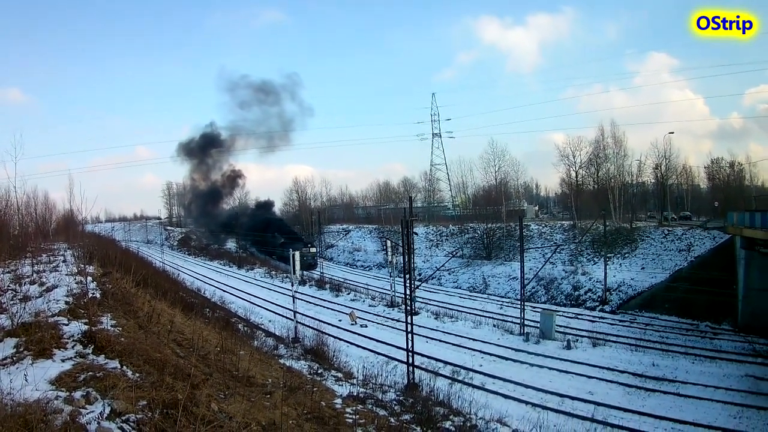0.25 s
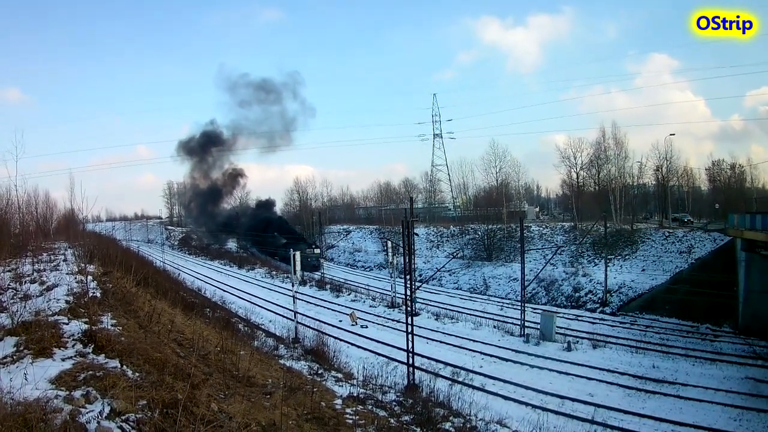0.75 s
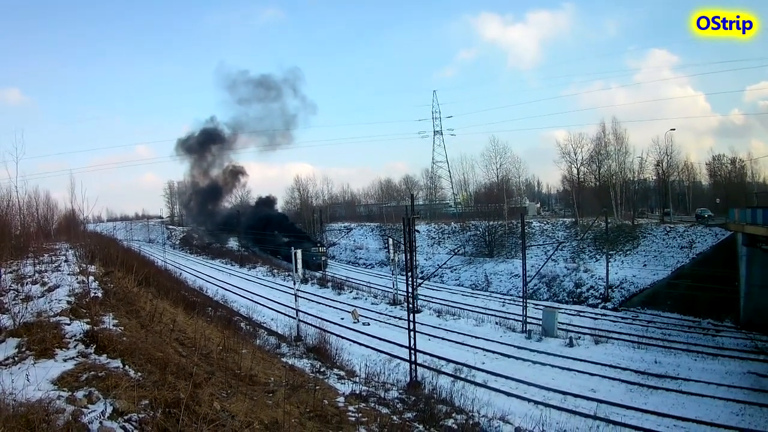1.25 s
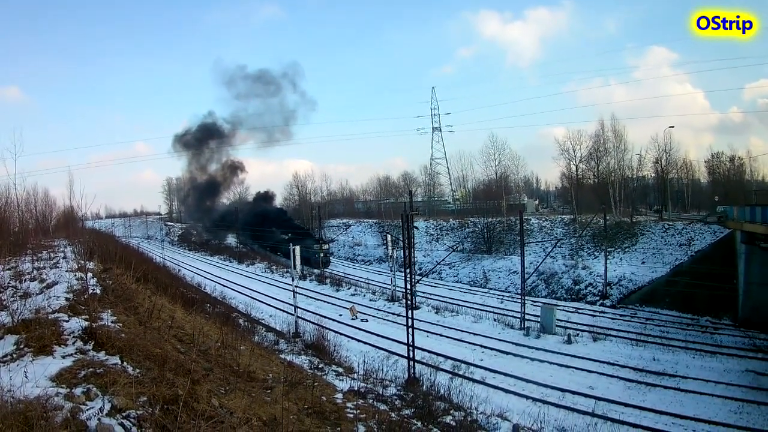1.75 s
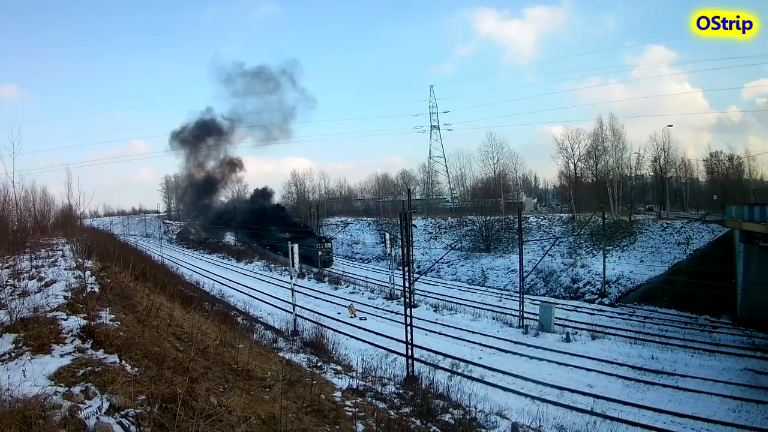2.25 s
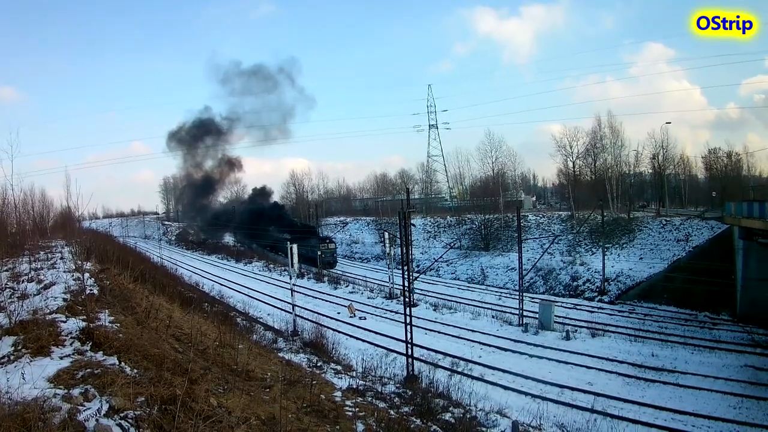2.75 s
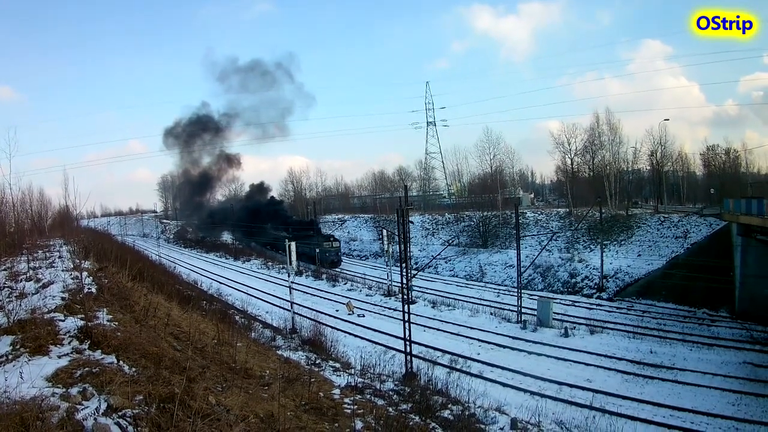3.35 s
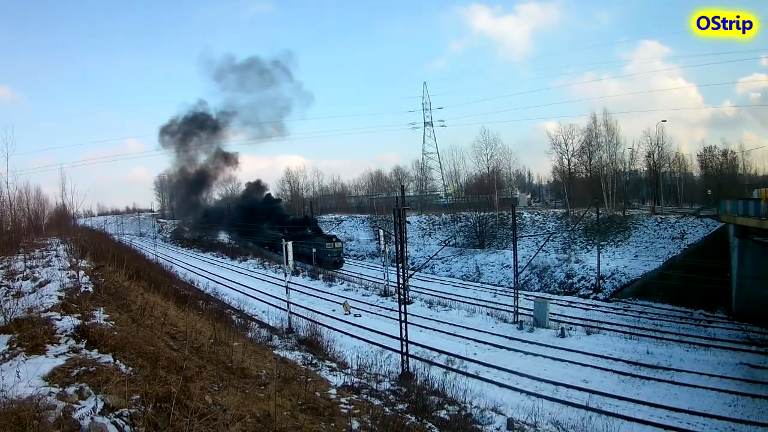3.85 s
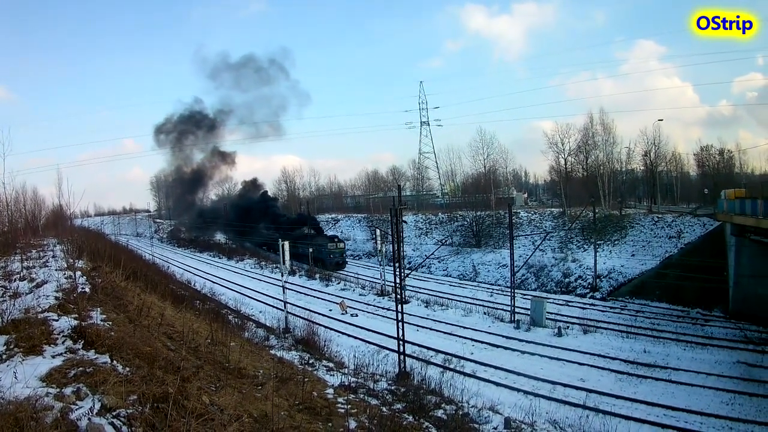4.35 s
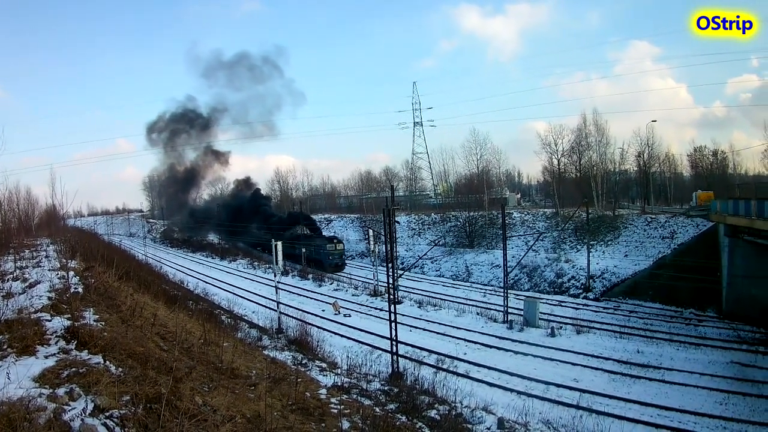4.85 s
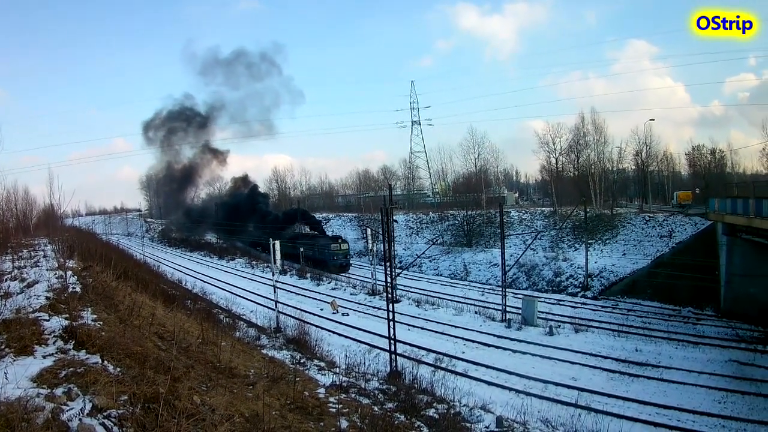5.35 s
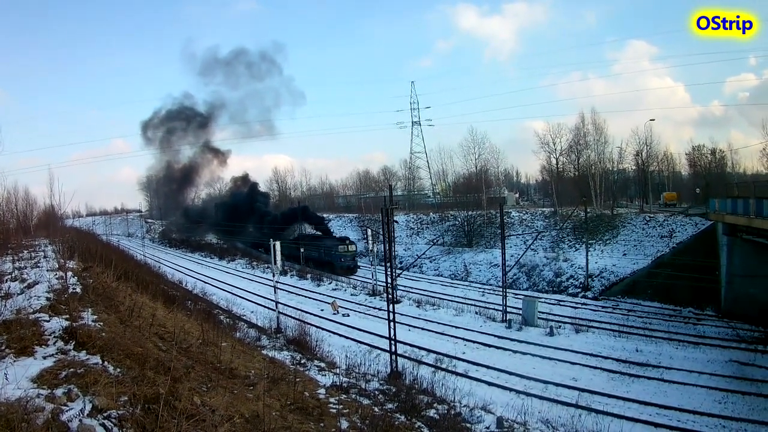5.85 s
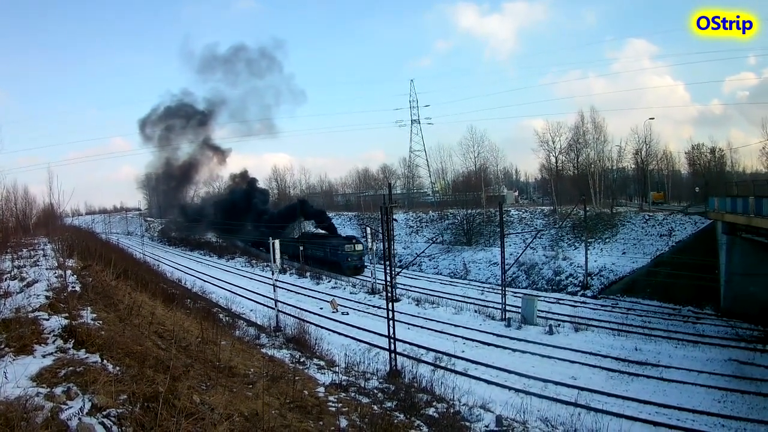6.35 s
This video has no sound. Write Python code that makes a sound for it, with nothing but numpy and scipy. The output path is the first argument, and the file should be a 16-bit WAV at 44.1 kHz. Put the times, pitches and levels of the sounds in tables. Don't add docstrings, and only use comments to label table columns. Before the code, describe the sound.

Outdoors on open snowy ground, a diesel locomotive works hard far away. Its rushing exhaust makes a hollow, ringing mid-pitched roar that swells and fades, above a low uneven boom, growl and faint wavering hum. The small microphone adds constant hiss and very thin whistles. Its housing knocks dully around two and a half seconds and again before four; a tiny metal rattle comes near the end.

```python
import sys
import numpy as np
from scipy import signal
from scipy.io import wavfile
from scipy.ndimage import uniform_filter1d

SR = 44100
rng = np.random.default_rng(int(sys.argv[2]) if len(sys.argv) > 2 else 0)


def gain_from_decibels(decibels):
    exponent = np.asarray(decibels, float) / 20
    return 10 ** exponent


def int16_out(signal):
    q = np.round(np.clip(np.atleast_2d(signal).T, -1, 1) * 32767)
    wavfile.write(sys.argv[1], SR, q.astype(np.int16))


N = 291501

# f/Hz, level/dB
HISS_COLOUR = [(1760, -35), (3000, -10.5), (3710, -10.5), (4290, -4.5), (5890, -8.5), (7550, -4.5),
               (9670, -7), (10900, -8.5), (11900, 3), (15500, -43.5), (22000, -120)]
HISS_DB = -48.5
HISS_FOLLOWS = 0.092
# f/Hz, level/dB (rms)
WHISTLES = [(7025, -75), (10508, -71), (10808, -76)]

# t/s, low mode level/dB, middle mode level/dB, high mode level/dB
TAG_TOUCHES = [(6.02, -46, -47, -62), (6.065, -46, -56, -56), (6.082, -43, -58, -62),
               (6.142, -54, -39, -50), (6.16, -39, -48, -48), (6.2, -48, -54, -62), (6.235, -45, -49, -62),
               (6.29, -52, -47, -62), (6.302, -46, -56, -62), (6.322, -56, -41, -62),
               (6.345, -47, -58, -62)]
# f/Hz, time to fall by 60 dB t/s
TAG_MODES = [(2860, .09), (3920, .11), (5120, .12)]

# t/s, peak level/dB, swing f/Hz, low-pass f/Hz, share of load before the slip (0-1)
KNOCKS = [
    (2.528, -15.5, 40, 750, .7),
    (3.7625, -16.5, 55, 170, .6),
]

# f/Hz, width f/Hz, level/dB
STACK_RINGS = [(42.5, 18, 0), (18, 12, -6)]
# f/Hz, level/dB (per Hz)
GROWL_COLOUR = [(35, -16), (60, -6.5), (145, -7), (253, -9.5), (588, -16), (700, -16.5), (910, -64),
                (1540, -120)]
# t/s, lift level/dB, length t/s
BOOM_SURGES = [(0.02, 0.5, 0.09), (0.7, 1.5, 0.33), (2.2, 4, 0.25), (2.55, 1.5, 0.13), (3.7, 3, 0.24),
               (4.0, 2.5, .08), (4.4, 1.5, 0.069), (4.7, 3.5, 0.092), (5.367, 4, 0.13), (5.7, 7, 0.12),
               (5.85, 1.5, .1), (6.55, 5.5, 0.13)]
BOOM_DB, GROWL_DB = -36, -38
GROWL_FOLLOWS = 0.074
FIRING_HZ = 79.26
# multiple of the firing rate, level/dB (rms)
FIRING_ORDERS = [(1, -51), (2, -58), (3, -54), (4, -64)]

# t/s, carried level/dB, depth of the ground echo's comb level/dB, echo lag t/ms
AIR_PATH = [(0, -34.5, 0, 0.74), (.6, -33, 1.5, 0.5), (1.0, -28, 3, 0.54), (1.3, -28.5, 1.5, 0.57),
            (1.55, -29, -1.5, 0.62), (2.1, -29.5, -4, 0.62), (2.55, -31, -1.5, 0.56), (2.97, -30, 2, 0.67),
            (3.45, -33.5, -0.5, 0.39), (3.8, -29, 1.5, 0.6), (4.12, -25.5, 1.5, 0.65),
            (4.35, -27, -0.5, 0.39), (4.57, -30, -3, 0.64), (4.75, -29, -0.5, 0.42), (5.2, -28.5, 1.2, 0.7),
            (5.4, -31, 0.2, 0.62), (6.0, -32, 1.5, 0.72), (6.61, -35, -1, 0.65)]
# f/Hz, width f/Hz, level/dB
MAIN_RINGS = [(1200, 125, 0), (1090, 240, -5)]
UPPER_RINGS = [(1630, 110, 0), (1740, 170, -3)]
SKIRT_RINGS = [(840, 450, 0)]
TOP_RINGS = [(2010, 200, 1), (2420, 580, -10), (3297, 690, -14.5), (3750, 420, -16)]
# t/s, lift level/dB
PUFFS = [(.86, 1.5), (.99, 5), (1.565, 5), (2.21, 8.5), (3.16, 5.5), (4.0, 3.5), (4.1, 2), (4.31, 6),
         (4.42, 3), (4.664, 4), (4.745, 9), (4.915, 4.5), (5.03, 7.5), (5.07, 4), (5.115, 8.5), (5.21, 4),
         (5.35, 3)]
PUFF_S = 0.014
# level/dB, share of the level swing, share of the comb
MAIN_OBEYS, FLANK_OBEYS = (-2.13, 1.26, 1.5), (-4.5, 0.9, 1.44)
UPPER_OBEYS, SKIRT_OBEYS = (-8, 1, 1.23), (-9, 0.85, 1.47)
EDGE_OBEYS, SHELF_OBEYS, TOP_OBEYS = (-14.5, 0.71, 0.64), (-21, 0.34, 0.4), (-20.5, 0.54, 0.98)


def rms_one(x):
    return x / np.sqrt(np.mean(x ** 2) + 1e-20)


def in_time(rows):
    s, *columns = np.transpose(rows)
    return [np.interp(np.arange(N) / SR, s, c) for c in columns]


def bumps(rows):
    t = np.arange(N) / SR
    return sum(db * np.exp(-((t - s) / length) ** 2) for s, db, length in rows)


def drift(rate):
    r = np.exp(-80 * np.pi * rate / SR)
    coarse = rng.standard_normal(N // 40 + 2002)
    slow = signal.lfilter([1], [1, -2 * r, r * r], coarse)[2000:]
    return np.interp(np.arange(N) / 40, np.arange(len(slow)), rms_one(slow - slow.mean()))


def resonance(x, hz, width):
    r = np.exp(-np.pi * width / SR)
    peak = np.array([1, 0, -1]) * (1 - r * r) / 2
    return signal.lfilter(peak, [1, -2 * r * np.cos(2 * np.pi * hz / SR), r * r], x)


def ringing_noise(rings, flicker_db, rate):
    out = np.zeros(N)
    for hz, width, db in rings:
        air = rng.standard_normal(N + SR)
        flicker = gain_from_decibels(db + flicker_db * drift(rate))
        once = resonance(air, hz, width * 1.52)
        out += flicker * resonance(once, hz, width * 1.52)[SR:]
    return rms_one(out)


def banded_noise(spectrum, patchy_db, rate, together_db):
    hz, db = np.transpose(spectrum)
    octaves = np.log2(min(hz[-1], SR / 3) / hz[0])
    edges = hz[0] * 2 ** np.arange(0, octaves + 1 / 3, 1 / 3)
    white = rng.standard_normal((2, N + SR))
    out = np.zeros(N)
    for k, (low, high) in enumerate(zip(edges, edges[1:])):
        band_pass = signal.butter(2, [low, high], "band", fs=SR, output="sos")
        band = signal.sosfilt(band_pass, white[k % 2])[SR:]
        level_db = np.interp(np.log(low * high) / 2, np.log(hz), db)
        out += gain_from_decibels(level_db + patchy_db * drift(rate)) * band
    return rms_one(out * gain_from_decibels(together_db * drift(rate)))


def evened(x, span_s, share):
    power = uniform_filter1d(x ** 2, round(span_s * SR))
    return rms_one(x / (power + 1e-12) ** (np.clip(share, 0, 1) / 2))


def electronics():
    t = np.arange(N) / SR
    whistles = sum(np.sqrt(2) * gain_from_decibels(db + 1.5 * drift(6)) * np.sin(2 * np.pi * hz * t)
                   for hz, db in WHISTLES)
    level_db = in_time(AIR_PATH)[0]
    hiss = banded_noise(HISS_COLOUR, patchy_db=0.4, rate=10, together_db=-0.5)
    hiss_db = HISS_DB + HISS_FOLLOWS * (level_db - level_db.mean())
    return gain_from_decibels(hiss_db) * hiss + whistles


def rattle():
    s, *modes_db = np.transpose(TAG_TOUCHES)
    out = np.zeros(N)
    for (hz, t60), db in zip(TAG_MODES, modes_db):
        clicks = np.full(N, 1e-18)
        clicks[np.round(s * SR).astype(int)] = gain_from_decibels(db)
        r = gain_from_decibels(-60 / (t60 * SR))
        w = 2 * np.pi * hz / SR
        out += signal.lfilter([0, np.sin(w)], [1, -2 * r * np.cos(w), r * r], clicks)
    return out


def knocks():
    out = np.zeros(N)
    t = np.arange(-SR // 50, SR // 10) / SR
    for s, db, hz, cut_hz, load in KNOCKS:
        loading = load * np.exp(t / 0.00062)
        swinging = -np.cos(2 * np.pi * hz * t) * np.exp(-t / 0.0079)
        swing = np.where(t < 0, loading, swinging)
        soft = signal.sosfilt(signal.butter(2, cut_hz, fs=SR, output="sos"), swing)
        out[round((s + t[0]) * SR):][:len(t)] += gain_from_decibels(db) * soft / np.abs(soft).max()
    return out


def exhaust():
    surge_db = bumps(BOOM_SURGES)
    boom = evened(ringing_noise(STACK_RINGS, flicker_db=0.4, rate=3), span_s=0.08, share=0.75)
    growl = banded_noise(GROWL_COLOUR, patchy_db=1.05, rate=2.1, together_db=-1.04)
    growl = evened(growl, span_s=0.39, share=0.72)
    growl_db = GROWL_DB + GROWL_FOLLOWS * surge_db + 0.94
    turns = np.cumsum(FIRING_HZ * (1 + 0.0112 * drift(2.76))) / SR
    hum = sum(np.sqrt(2) * gain_from_decibels(db + 1.9 * drift(12.0)) * np.sin(2 * np.pi * (k * turns + rng.random()))
              for k, db in FIRING_ORDERS)
    return gain_from_decibels(BOOM_DB + surge_db) * boom + gain_from_decibels(growl_db) * growl + hum


def roar():
    level_db, comb_db, lag_ms = in_time(AIR_PATH)
    mean_db = level_db.mean()

    def carried(rings, db, share, comb):
        ripple = np.cos(2 * np.pi * rings[0][0] * lag_ms / 1000)
        return gain_from_decibels(mean_db + db + share * (level_db - mean_db) + comb * comb_db * ripple)

    puffs = gain_from_decibels(bumps([(s, db, PUFF_S) for s, db in PUFFS]))
    upper = evened(ringing_noise(UPPER_RINGS, flicker_db=2.5, rate=8.5), span_s=0.08, share=0.82)
    out = carried(UPPER_RINGS, *UPPER_OBEYS) * upper
    skirt = evened(ringing_noise(SKIRT_RINGS, flicker_db=-3.0, rate=2.2), span_s=0.24, share=0.53)
    out += carried(SKIRT_RINGS, *SKIRT_OBEYS) * skirt
    for rings, obeys, lift in ((MAIN_RINGS[:1], MAIN_OBEYS, puffs), (MAIN_RINGS[1:], FLANK_OBEYS, 1)):
        noise = evened(ringing_noise(rings, flicker_db=-0.5, rate=21), span_s=0.102, share=0.6)
        out += lift * carried(rings, *obeys) * noise
    top_groups = ((TOP_RINGS[:1], EDGE_OBEYS), (TOP_RINGS[1:2], SHELF_OBEYS), (TOP_RINGS[2:], TOP_OBEYS))
    for rings, obeys in top_groups:
        noise = evened(ringing_noise(rings, flicker_db=1.3, rate=23.0), span_s=0.25, share=0.47)
        out += carried(rings, *obeys) * noise
    return out


def scene():
    return (roar() + exhaust() + knocks() + rattle() + electronics())[None]


def roughened_treble(x, grain_db, from_hz):
    hz, _, cells = signal.stft(np.pad(x, ((0, 0), (0, 2048)), "reflect"), SR, nperseg=1024)
    error_db = rng.standard_normal((len(hz) // 3 + 1, cells.shape[-1]))
    error_db = error_db.repeat(3, axis=0)[:len(hz)]
    reach = np.clip(np.log2(hz / from_hz + 1e-9), 0, 1)[:, None]
    return signal.istft(cells * gain_from_decibels(grain_db * reach * error_db), SR, nperseg=1024)[1][..., :N]


def roll_off(x):
    return signal.sosfilt(signal.butter(12, 15650, fs=SR, output="sos"), x)


def record(dry):
    rough = roughened_treble(dry, grain_db=2.2, from_hz=2500)
    wall = signal.ellip(14, 0.5, 60, 11990, fs=SR, output="sos")
    cut = signal.sosfilt(wall, rough)
    trace = gain_from_decibels(-72.5) * rng.standard_normal(dry.shape)
    return roll_off(cut + trace)


dry = scene()
out = record(dry)
int16_out(out)
```